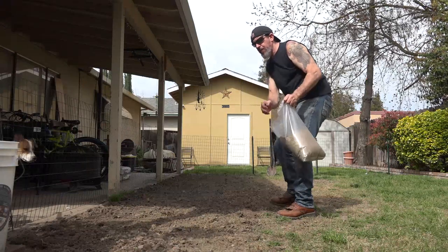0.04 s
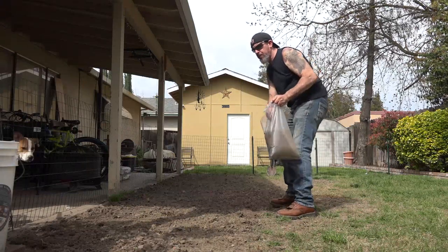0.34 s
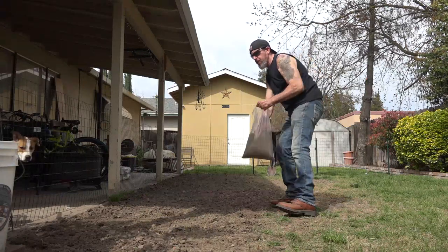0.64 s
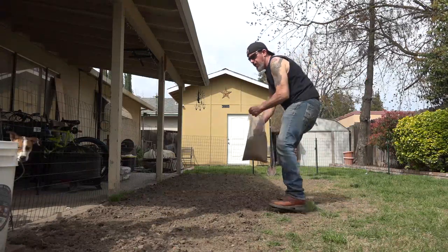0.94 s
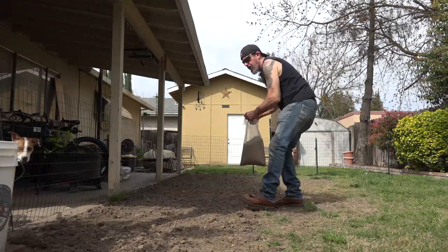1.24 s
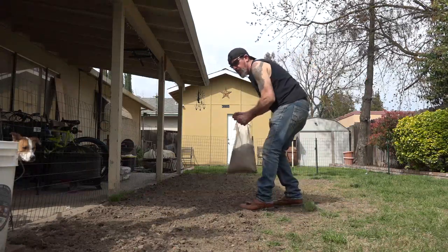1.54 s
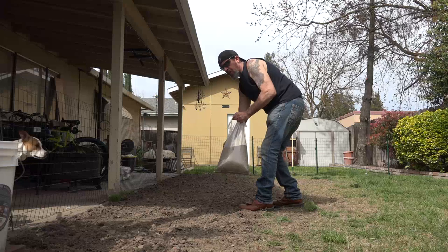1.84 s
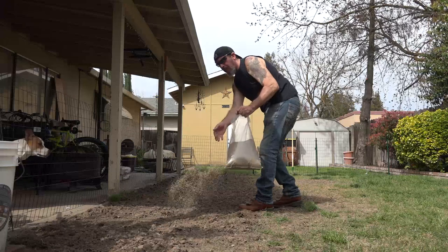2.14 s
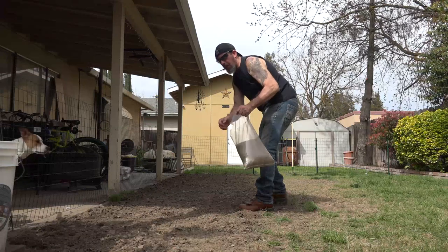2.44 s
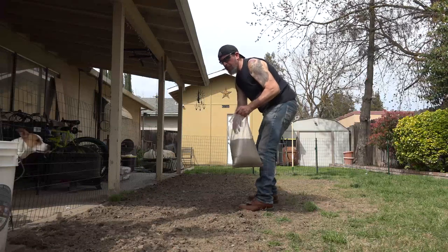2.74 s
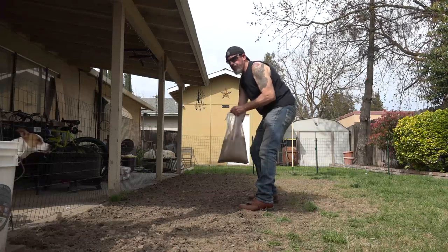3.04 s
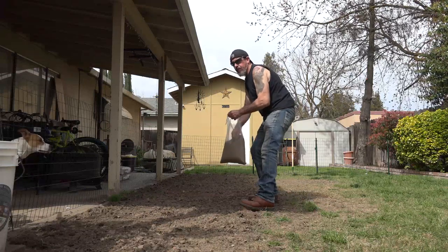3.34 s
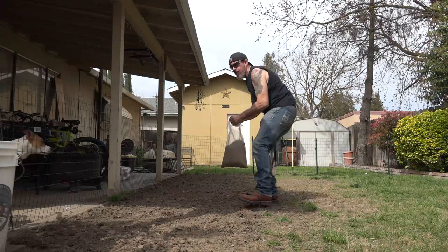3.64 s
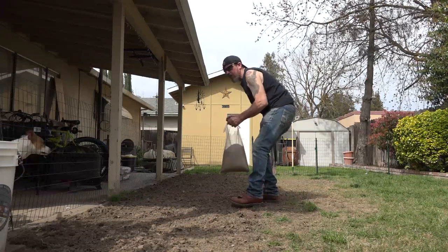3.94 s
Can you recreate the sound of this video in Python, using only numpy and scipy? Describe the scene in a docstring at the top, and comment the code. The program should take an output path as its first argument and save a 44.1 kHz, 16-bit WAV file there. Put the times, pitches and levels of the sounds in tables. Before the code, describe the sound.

Seed showers onto dirt twice in a back yard, the second time more softly. Around the throws, a nearby plastic bag crinkles and boots scuff and bump the ground, over steady traffic rumble and a briefly swelling engine drone.

```python
"""First comes a fine, bright shower: a handful of grass seed pattering onto bare soil in a back yard.
Traffic rumbles throughout, and one engine drone swells at the start and fades. A hand digs in a
plastic bag, whose small creases rustle and large ones snap, while boots scuff and bump the ground.
A second, softer handful lands at about 2.4 seconds, and then the bag rustles again."""
import sys
import numpy as np
from scipy import signal
from scipy.fft import rfft, irfft
from scipy.io import wavfile

SR = 44100
rng = np.random.default_rng(int(sys.argv[2]) if len(sys.argv) > 2 else 0)


def int16_out(signal):
    """Quantize to a 16-bit WAV file."""
    q = np.round(np.clip(np.atleast_2d(signal).T, -1, 1) * 32767)
    wavfile.write(sys.argv[1], SR, q.astype(np.int16))


N = 176400
T = np.arange(N) / SR


def from_db(db):
    """Turn decibels into a factor to multiply by."""
    return 10 ** (np.asarray(db) / 20)


def rms_one(x):
    """Scale a signal so that its average strength (rms) is 1."""
    return x / np.sqrt(np.mean(x ** 2) + 1e-20)


def coloured(x, colour):
    """Shape the lows and highs, at strength 1. Each colour row: frequency in Hz, relative level in dB."""
    hz, db = np.transpose(colour)
    freqs = np.maximum(np.arange(N // 2 + 1) * SR / N, 1)
    gain = from_db(np.interp(np.log(freqs), np.log(hz), db))
    return rms_one(irfft(rfft(x) * gain, N))


def noise(colour):
    """Steady noise with the given tone colour."""
    return coloured(rng.standard_normal(N), colour)


def drift(rate_hz):
    """A random wobble of strength 1, mostly slower than rate_hz."""
    freqs = np.arange(N // 2 + 1) * SR / N
    return rms_one(irfft(rfft(rng.standard_normal(N)) / (1 + (freqs / rate_hz) ** 2), N))


def band(x, low_hz, high_hz):
    """Keep the part of a sound between two frequencies."""
    sos = signal.butter(2, [low_hz, min(high_hz, SR * .45)], "band", fs=SR, output="sos")
    return signal.sosfilt(sos, x)


def add(out, start_s, sound):
    """Mix a sound into out at the given time."""
    i = max(int(start_s * SR), 0)
    out[i:i + len(sound)] += sound[:N - i]


def grains(per_s, spread_db, colour):
    """Tiny random impacts of uneven size, with the given tone colour."""
    sizes = from_db(spread_db * np.minimum(rng.exponential(1, N), 5)) * rng.choice([-1, 1], N)
    hits = rng.random(N) < per_s / SR
    return coloured(sizes * hits, colour)


def swells(rows):
    """A loudness curve made of smooth, bell-shaped humps."""
    power = np.zeros(N)
    for peak_s, db, rise_s, fall_s in rows:
        width_s = np.where(T < peak_s, rise_s, fall_s)
        power += from_db(db) ** 2 * np.exp(-.5 * ((T - peak_s) / width_s) ** 2)
    return np.sqrt(power)


def seed_showers():
    """Each handful hits the soil as a dense cloud of tiny impacts, with some stragglers."""
    # Each row: loudest moment in seconds, level in dB, rise and fall in seconds.
    handfuls = [(0.0, -28, .1, 0.071), (2.395, -35, .085, 0.061)]
    # Each row: frequency in Hz, relative level of the patter in dB.
    colour = [(900, -34), (2000, -1), (3400, -1.5), (5000, -6.5), (8000, -2), (10500, 0), (13000, 1.5),
              (16000, 3.5)]
    cloud = swells(handfuls) * grains(per_s=33000, spread_db=4, colour=colour)
    # Stragglers are quieter and spread over a longer time.
    stragglers = [(s, db - 15, rise * 1.7, fall * 1.7) for s, db, rise, fall in handfuls]
    return cloud + swells(stragglers) * grains(per_s=2500, spread_db=3, colour=colour)


def traffic():
    """Traffic blends into one deep, steady rumble."""
    # Each row: frequency in Hz, relative level in dB.
    colour = [(15, -30), (30, -14), (40, -5.5), (52, -2.5), (70, 0.5), (90, -3), (115, 2), (132, -10),
              (150, -13), (195, -12.5), (250, -22), (330, -25.5), (450, -39), (800, -64.5)]
    return from_db(-18.5) * noise(colour)


def engine():
    """A distant engine hums with three low tones that swell, then sink into the rumble."""
    # Each row: time in seconds, pitch in Hz, overall level in dB.
    drone = [(0, 78.75, -10.5), (.1, 79.9, -12.5), (.21, 81.07, -5), (0.259, 80.74, -7), (.34, 79.77, -10),
             (.43, 79.94, -14.5), (.8, 72.87, -16.5), (4, 76, -57)]
    # Each row: multiple of the pitch, relative level of that tone in dB.
    tones = [(1, -4.5), (1.5, -11.5), (2, -32.5)]
    times, hz, db = np.transpose(drone)
    pitch_hz = np.interp(T, times, hz) * (1 + 0.011 * drift(5.1))
    phase = 2 * np.pi * np.cumsum(pitch_hz) / SR
    hum = sum(from_db(tone_db) * np.sin(k * phase + 2 * np.pi * rng.random()) for k, tone_db in tones)
    return from_db(np.interp(T, times, db)) * np.sqrt(2) * hum


def outdoor_air():
    """The open air is a soft rush that wavers a little."""
    # Each row: frequency in Hz, relative level in dB.
    colour = [(200, -12.5), (450, 2), (700, -1), (1000, 2), (1350, -0.4), (1650, -4), (2000, -8.5),
              (2700, -10.5), (3500, -8), (4050, -15.5), (4500, -20), (7000, -30), (11000, -30),
              (16000, -39)]
    level_db = -39 + 1.03 * drift(4.7)
    return from_db(level_db) * noise(colour)


def whistle(hz, width_hz):
    """Noise passed twice through a narrow filter becomes a breathy whistle."""
    b, a = signal.iirpeak(hz, hz / width_hz, fs=SR)
    return rms_one(signal.lfilter(b, a, signal.lfilter(b, a, rng.standard_normal(N))))


def far_hiss():
    """A far hiss with two faint whistles in it drops back before the second handful."""
    # Each row: time in seconds, level of the hiss in dB.
    levels = [(0, -44.5), (.45, -44), (.9, -42.5), (1.4, -45.5), (1.8, -53.5), (4, -51)]
    # Each row: frequency in Hz, relative level in dB.
    colour = [(300, 9), (700, -4.5), (1100, 0), (1450, 2), (1900, -5.5), (2800, -9), (3400, 2.5),
              (3900, -0.5), (4150, -4), (5000, -11.5), (6500, -19), (9000, -27)]
    # Each row: pitch in Hz, width in Hz, level in dB compared with the hiss.
    whistles = [(1618, 49, -11), (3810, 110, -9.5)]
    hiss = noise(colour) + sum(from_db(db) * whistle(hz, width) for hz, width, db in whistles)
    return from_db(np.interp(T, *np.transpose(levels))) * hiss


def stray_seeds():
    """Single seeds tick on something hard close by."""
    # Each row: start in seconds, peak level in dB.
    ticks = [(.046, -21.5), (0.075, -19), (0.082, -15.5), (0.133, -25), (.151, -18), (0.179, -21),
             (0.182, -27), (.205, -25), (.213, -27), (.226, -32), (.259, -29.5), (.293, -34)]
    decay_s = 0.00063
    out, t = np.zeros(N), T[:SR // 100]
    for start_s, db in ticks:
        tick = band(rng.standard_normal(len(t)) * np.exp(-t / decay_s), 1500, 16000)
        add(out, start_s, from_db(db) * tick / np.abs(tick).max())
    return out


def bag_rustle():
    """Many small creases give way as the plastic is handled and the hand sweeps out."""
    # Each row of both: loudest moment in seconds, level in dB, rise and fall in seconds.
    rustles = [(.077, -33.5, 0.0029, 0.0046), (.382, -35.5, 0.0025, 0.0046), (.396, -37.5, 0.0054, 0.0059),
               (.463, -35, 0.0028, 0.0073), (.5, -44, 0.071, .05), (.595, -37.5, 0.0085, 0.02),
               (.68, -36, 0.013, .035), (1.07, -43, 0.018, 0.028), (1.19, -38, 0.016, .025),
               (1.258, -34, 0.013, .014), (1.3, -38.5, .025, 0.039), (1.53, -41.5, 0.039, 0.045),
               (2.86, -40.5, 0.035, 0.053), (2.922, -32.5, 0.011, 0.0081), (2.947, -38.5, .003, .006),
               (3.035, -38, .04, 0.046), (3.29, -44, 0.095, 0.051), (3.395, -35.5, 0.014, 0.016),
               (3.495, -38.5, 0.04, 0.021), (3.6, -38.5, 0.051, 0.055), (3.815, -42, 0.034, 0.03)]
    sweeps = [(2.122, -33.5, 0.0058, 0.013), (2.162, -32.5, 0.014, 0.025)]
    # Each row of both: frequency in Hz, relative level in dB.
    rustle_colour = [(350, -20), (800, 6), (1300, 9), (2000, 5), (3200, 6), (4500, -2.5), (7000, -9.5),
                     (11000, -23.5), (16000, -33)]
    sweep_colour = [(500, -11), (1100, -0.5), (2200, -1.5), (3300, 2.5), (5000, -3.5), (8000, -8.5),
                    (12000, -16), (16000, -21)]
    rustle = swells(rustles) * grains(per_s=2500, spread_db=1, colour=rustle_colour)
    sweep = swells(sweeps) * grains(per_s=3100, spread_db=0, colour=sweep_colour)
    flicker_db = 0.14 * drift(70)
    return (rustle + sweep) * from_db(flicker_db)


def fence_echoes(sound):
    """Wall and fence send back a few dull copies of a sound."""
    # Each row: delay in seconds, relative level in dB.
    echoes = [(.013, -18), (.029, -31.5), (.047, -27)]
    out, dull = np.zeros(N), band(sound, 320, 5200)
    for delay_s, db in echoes:
        add(out, delay_s, from_db(db) * dull)
    return out


def boot_scuffs():
    """Crumbs of soil give way under a shifting sole."""
    # Each row: loudest moment in seconds, level in dB, rise and fall in seconds.
    scuffs = [(.225, -33, 0.022, 0.022), (.3, -35, 0.017, 0.029), (.465, -39.5, 0.0063, .008),
              (.655, -29.5, 0.003, 0.017), (1.06, -33, 0.007, .008), (1.28, -29.5, 0.021, 0.033),
              (1.375, -34, .01, .01), (3.05, -31, 0.009, 0.018), (3.625, -29, 0.0074, 0.015)]
    # Each row: frequency in Hz, relative level in dB.
    colour = [(120, 12), (300, -5), (550, 4), (800, -7.5), (1250, -9), (2000, -30), (5000, -32),
              (12000, -48)]
    return swells(scuffs) * grains(per_s=900, spread_db=5, colour=colour)


def boot_bumps():
    """A boot knocks softly on the soil, setting off a few low tones that die quickly."""
    # Each row: start in seconds, overall level in dB.
    bumps = [(0.3358, -14.5), (1.376, -28), (2.713, -24), (3.179, -23.5)]
    # Each row: base pitch in Hz, relative level in dB, seconds to fade by 60 dB.
    tones = [(227, -6.5, .04), (338, -4.5, 0.064), (422, -1.5, 0.021), (544, 0, 0.022), (744, -8.5, 0.018),
             (1070, -16, .012)]
    out, t = np.zeros(N), T[:SR // 8]
    for start_s, db in bumps:
        tuning = rng.uniform(1.0, 1.05)
        for k, (hz, tone_db, fade_s) in enumerate(tones):
            tone = (-1) ** k * np.sin(2 * np.pi * hz * tuning * t)  # every other tone is flipped
            add(out, start_s, from_db(db + tone_db - 60 * t / fade_s) * tone)
    return out


def seed_slides():
    """Seed rubs over seed as it shifts in the bag or slips out of the fingers."""
    # Each row: loudest moment in seconds, level in dB, rise and fall in seconds.
    slides = [(.53, -53.5, 0.038, .06), (.70, -50, .02, .016), (.885, -52.5, .02, .025),
              (2.035, -47, 0.031, 0.018), (2.169, -34, 0.0065, .007), (2.19, -46, 0.039, 0.014),
              (3.04, -49, 0.032, 0.022), (3.6, -56, .05, .04)]
    # Each row: frequency in Hz, relative level in dB.
    colour = [(900, -22), (2000, -11), (3400, -7), (6000, -2.5), (9000, 0), (12500, -1.5), (16000, -0.5)]
    return swells(slides) * grains(per_s=7000, spread_db=3, colour=colour)


def bag_snaps():
    """A large crease buckles: a click, a very short crack, then the plastic shivers."""
    # Each row: start in seconds, overall level in dB, then dB added to the low, middle and top band.
    snaps = [(0.568, -23, -8.5, -22, -24), (0.65, -9.5, -14.5, -13, -30), (0.665, -15, -6.5, -15, -35),
             (0.836, -19, -23, -14.5, -22.5), (1.115, -26, -7, -13, -33), (1.16, -15.5, -14, -14, -23),
             (1.237, -12, -10.5, -15, -23), (1.24, -20, -9, -11, -34), (1.297, -17, -11, -17, -28),
             (3.031, -18, -22, -8.5, -20), (3.044, -14.5, -10, -14.5, -31), (3.065, -18.5, -10, -19, -31),
             (3.242, -24.5, -12, -11.5, -29), (3.287, -24, -15, -17, -29),
             (3.305, -13.5, -12.5, -16.5, -21.5), (3.373, -16, -9.5, -17, -28), (3.38, -17, -7, -12, -35),
             (3.484, -16.5, -12, -11.5, -43), (3.502, -22.5, -3.5, -19, -35), (3.58, -18.5, -9.5, -15, -33)]
    # The bands the plastic rings in. Each row: low and high edge in Hz, gain in dB, decay in seconds.
    bands = [(900, 1620, 1, 0.0037), (2250, 3650, 4.5, 0.0019), (4500, 11000, 2.5, 0.0012)]
    out, t = np.zeros(N), T[:SR // 10]
    click = from_db(8) * (t == 0)
    shiver = from_db(-17.5) * np.exp(-t / 0.018)
    for start_s, db, *band_levels in snaps:
        for (low_hz, high_hz, gain_db, decay_s), band_db in zip(bands, band_levels):
            fade = np.exp(-t / decay_s) + shiver
            crack = band(rng.standard_normal(len(t)) * fade + click, low_hz, high_hz)
            crack *= np.sqrt(np.sum(fade ** 2) / np.sum(crack ** 2))  # as much energy as the fade curve
            add(out, start_s, from_db(db + band_db + gain_db) * crack)
    return out


def scene():
    """Mix the sower, the seed and the yard into one channel; only the bag and boots echo."""
    sower = bag_rustle() + bag_snaps() + boot_bumps() + boot_scuffs()
    seed = seed_showers() + seed_slides() + stray_seeds()
    yard = outdoor_air() + far_hiss() + traffic() + engine()
    return (sower + fence_echoes(sower) + seed + yard)[None]


def record(dry):
    """Fade both ends so they do not click, and cut off the very highest treble."""
    fade_s, cutoff_hz = .003, 15800
    fade = np.minimum(np.minimum(T, T[::-1]) / fade_s, 1)
    return signal.sosfilt(signal.ellip(12, .1, 90, cutoff_hz, fs=SR, output="sos"), dry * fade)


dry = scene()
out = record(dry)
int16_out(out)
```